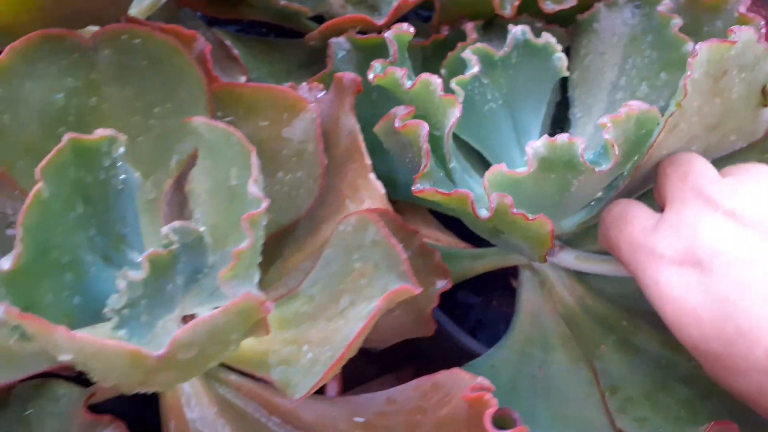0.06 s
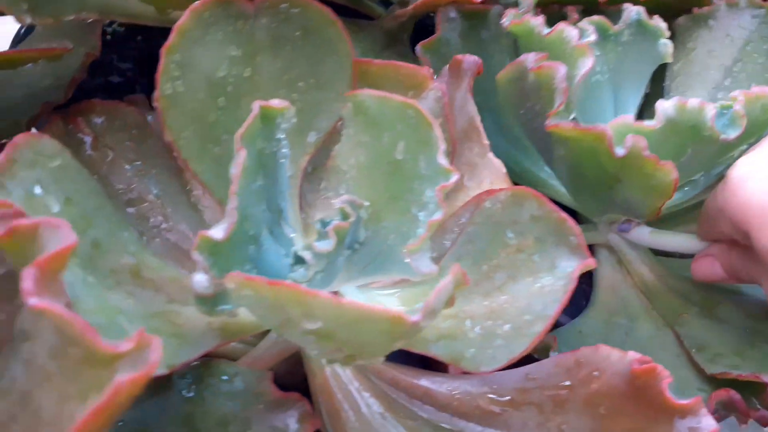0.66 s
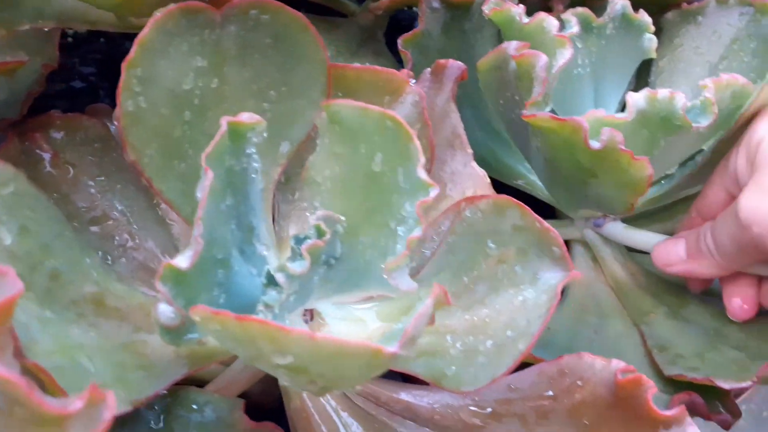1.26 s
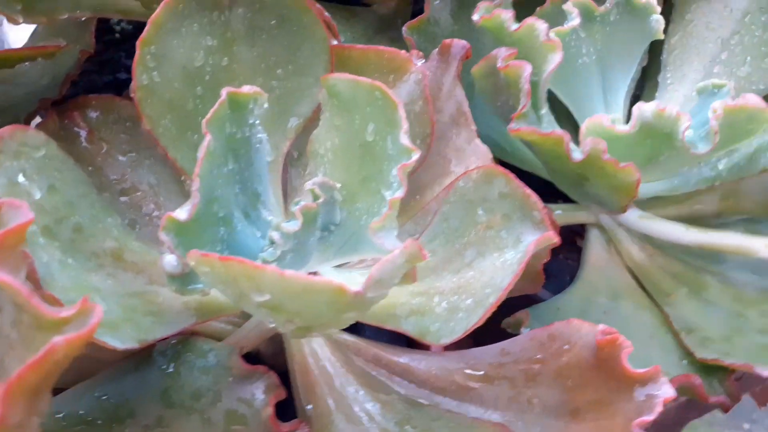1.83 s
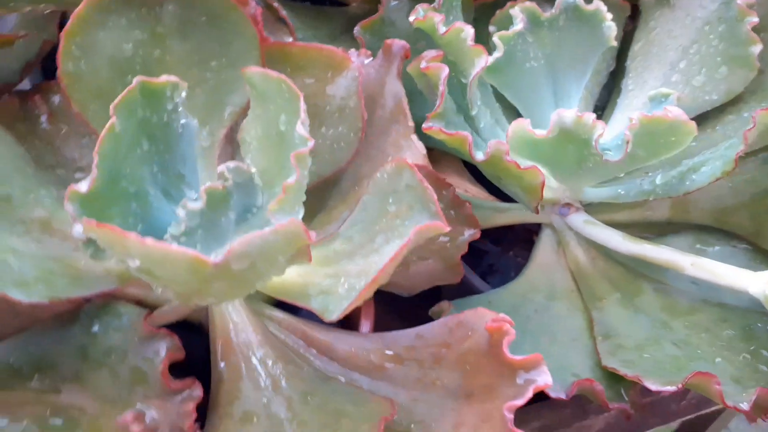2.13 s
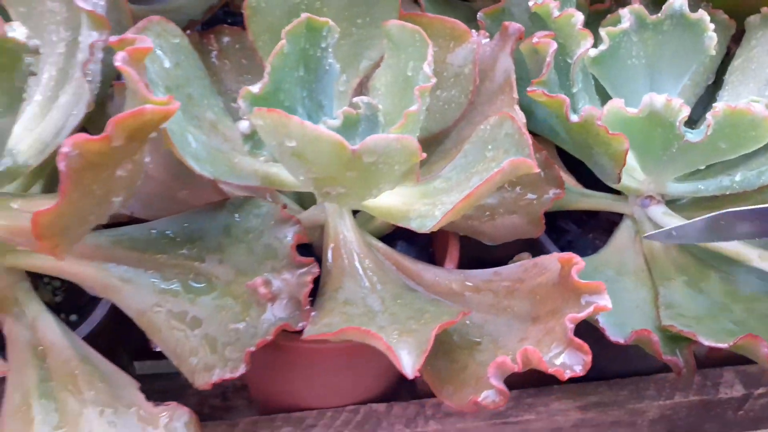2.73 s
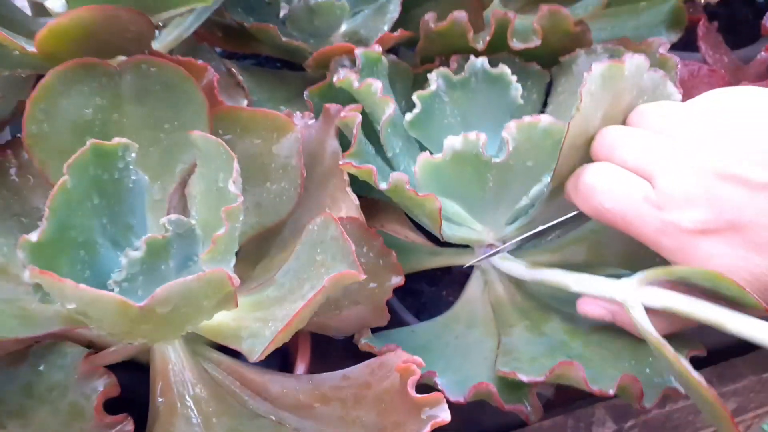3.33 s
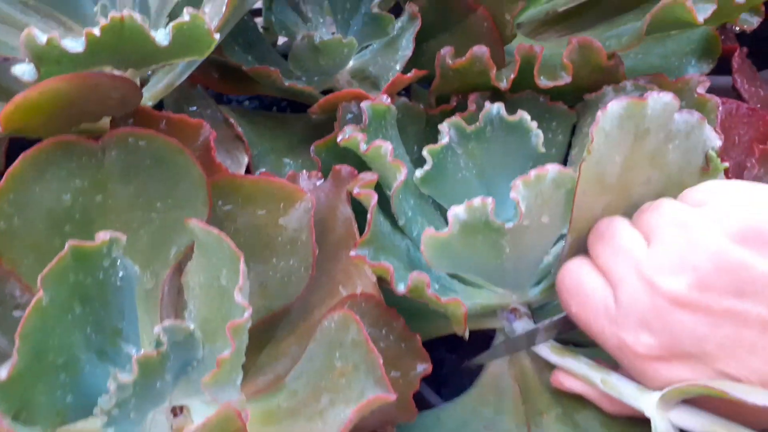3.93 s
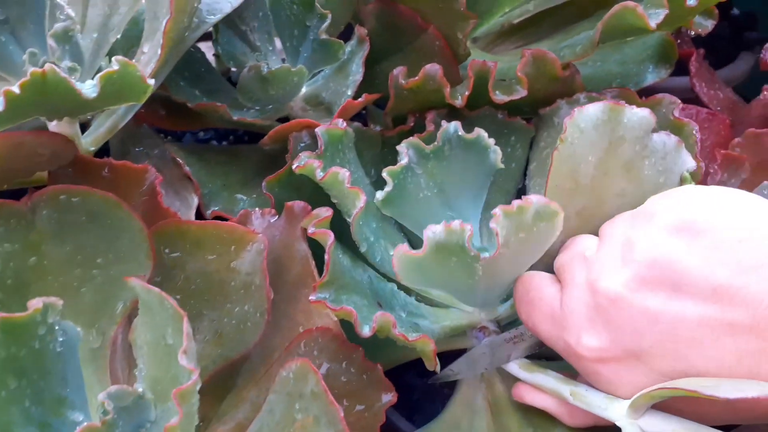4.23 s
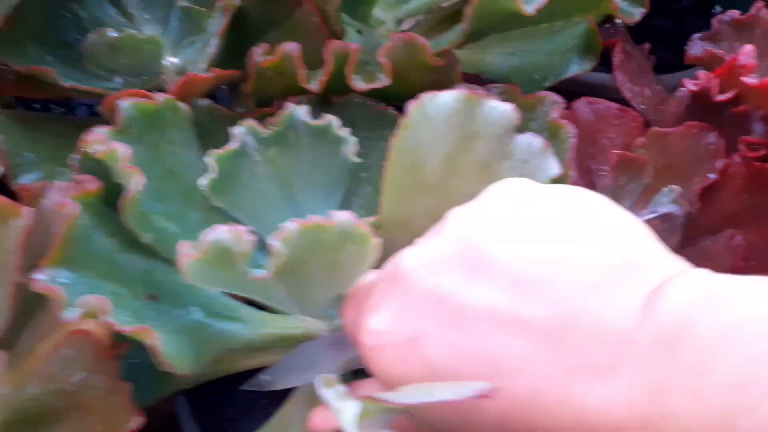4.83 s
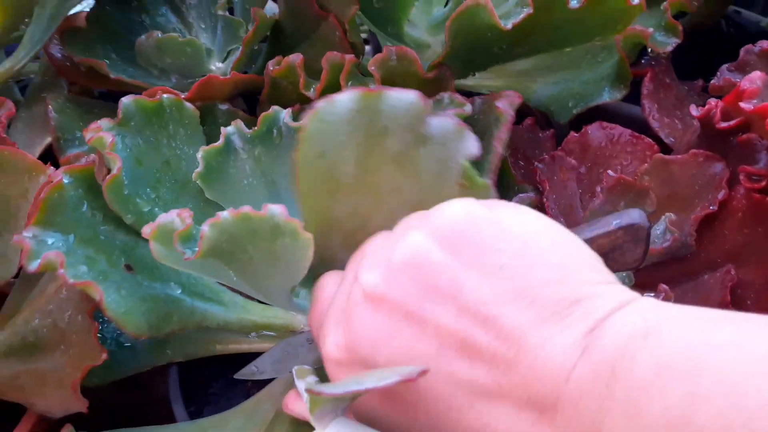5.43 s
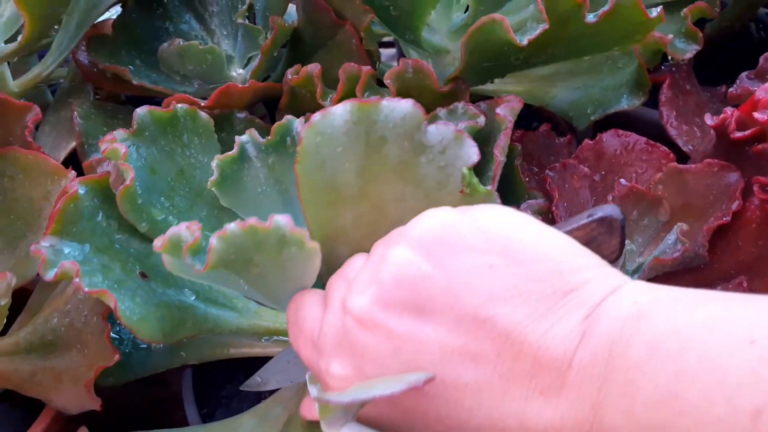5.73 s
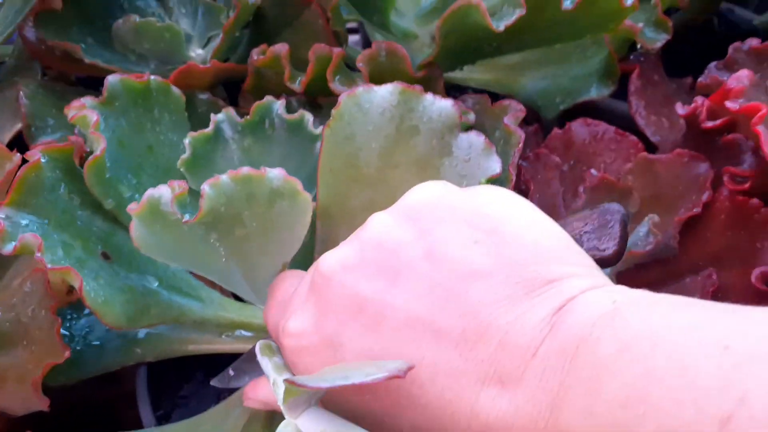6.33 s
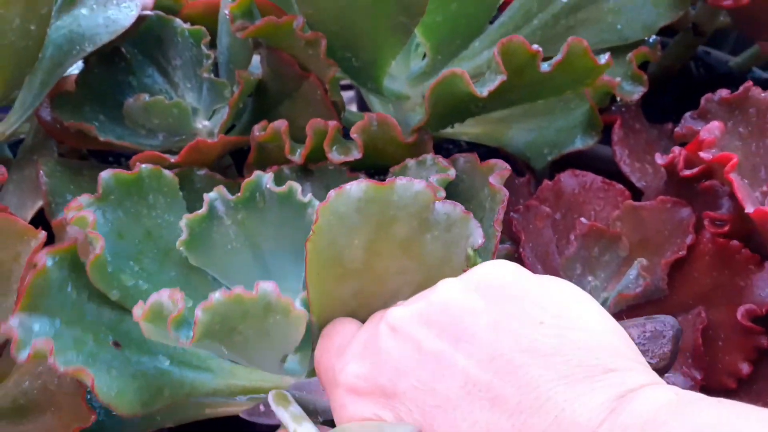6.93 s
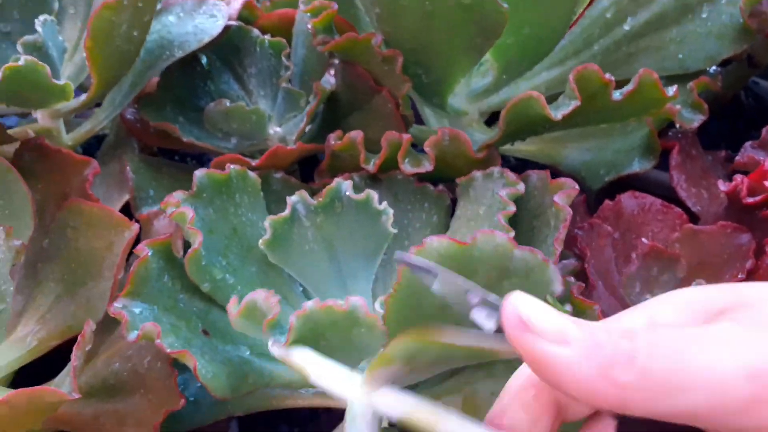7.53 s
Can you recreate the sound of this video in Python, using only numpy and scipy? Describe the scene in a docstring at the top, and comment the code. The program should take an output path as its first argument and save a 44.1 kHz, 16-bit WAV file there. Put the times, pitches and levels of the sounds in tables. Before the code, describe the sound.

Short, low dove coos repeat outdoors while a far vehicle pulls away and a succulent stem clicks sharply under a knife.

```python
"""A backyard: a dove coos nine times while a knife works on a succulent close to the microphone.
Each coo is a near-pure arch of pitch that beats against its echoes. Leaves rustle and a fine hiss swells
and fades; the juicy stem snaps in sharp clicks as its cells burst. Beyond the yard a vehicle pulls away,
its exhaust note climbing three times over a low wash of traffic. The microphone is bumped once."""
import sys
import numpy as np
from scipy import signal
from scipy.fft import rfft, irfft
from scipy.io import wavfile
from scipy.ndimage import uniform_filter1d

SR = 44100
rng = np.random.default_rng(int(sys.argv[2]) if len(sys.argv) > 2 else 0)


def transcribe(signal):
    """Save signal, clipped to [-1, 1], as a 16-bit WAV file at the path in sys.argv[1]."""
    frames = np.atleast_2d(signal).T
    limited = np.clip(frames, -1, 1)
    pcm = np.round(limited * 32767).astype(np.int16)
    wavfile.write(sys.argv[1], SR, pcm)


N = 334278

# Each row: start, length and rise in seconds, pitch in Hz, climb in Hz/s, level and swell in dB,
# hoarse opening's delay in seconds and level in dB, held octave in dB, echo delay in seconds, echo in dB.
COOS = [ (-.041, 0.47, 0.15, 347.6, -41.5, -44, -0.5, 0.1, -67, -70.5, 0.07, -5.5),
        (0.881, 0.43, .110, 346.8, 75.5, -41.5, 3, 0.0099, -63, -69.5, 0.029, -6),
        (1.820, 0.31, 0.085, 326.8, -35, -43.5, 7, 0.0091, -56.5, -72.5, .0310, -7),
        (2.628, 0.5, 0.11, 352.4, 151, -42.5, 7.5, 0.027, -56, -81, 0.021, -11),
        (3.48, .542, 0.11, 340, 238, -45.5, 9, 0.073, -62, -87, 0.05, -5),
        (4.379, 0.44, 0.11, 347, 160, -46.5, 7, 0.072, -62.5, -71, 0.037, -4.5),
        (5.213, .514, .107, 353, 166, -47.5, 8.5, .03, -61, -70, 0.01266, -5.5),
        (6.149, 0.45, 0.099, 350, -34, -43.5, 7, 0.013, -60.5, -75, .0130, -7.5),
        (7.016, 0.47, 0.13, 359.8, 12, -44.5, 7, 0.035, -57.5, -85, .0157, -7.5), ]
# Far yard walls. Each row: delay in seconds, gain in dB.
WALL_ECHOES = [(.037,-15.5),(.058,-14.5)]
# Brief dropouts of the coos. Each row: time in seconds, share lost from 0 to 1.
COO_DIPS = [(.18,0.4),(1.07,.7),(2.825,1),(3.093,.6),(4.85,.5),(5.42,.6),(6.535,0.47),(3.91,0.8),(4.59,.6),(5.52,0.8),(5.606,.6),(6.416,1),(6.477,0.66),(7.2,0.5),(7.285,0.8),(7.361,1)]
# Each row: time in seconds, then rumble, body and tyre roar in relative dB.
TRAFFIC_LEVELS = [(0,-61.5,-62,-80.5),(.65,-64,-65,-81),(1.05,-58.5,-63,-82.5),(1.75,-60,-64,-72.5),(2.5,-61,-63,-77.5),(3.02,-56,-53.5,-71.5),(3.35,-61.5,-59.5,-81.5),(3.8,-57,-53.5,-72.5),(4.25,-66.5,-53.5,-74),(4.6,-61,-52.5,-73),(4.95,-57,-50.5,-64.5),(5.25,-60.5,-50.5,-64.5),(5.95,-55.5,-58.5,-74.5),(6.45,-59,-56,-71.5),(6.85,-58.5,-62,-72.5),(7.15,-60,-56.5,-68),(7.58,-61.5,-57,-69)]
# Noise colours. Each row: frequency in Hz, spectral density in relative dB.
RUMBLE_SPECTRUM = [(20,-32.5),(40,-25),(65,-0.5),(110,6.5),(150,-6.5),(220,-26.5),(400,-69.5)]
BODY_SPECTRUM = [(90,-30),(160,-8),(230,0),(350,1),(430,-7),(560,-16),(800,-25.5),(1500,-74)]
TYRE_SPECTRUM = [(250,-29),(480,1),(700,-4.5),(1000,-7),(1500,-12.5),(1900,-19.5),(4000,-46.5)]
AIR_SPECTRUM = [(900,-23),(1500,-12),(2500,0.5),(4000,-5),(5700,-9),(7500,-0.5),(9500,-7),(13000,-5.5),(15800,-6)]
HISS_SPECTRUM = [(600,-39.5),(1500,5),(2500,-0.5),(4000,1),(6000,0),(8200,-0.5),(9600,-15.5),(11000,-13),(13000,-4.5),(15800,-10.5)]
CRACK_SPECTRUM = [(100,1),(800,-0.5),(1400,-4),(2200,-1.5),(4000,-4),(8000,0),(10000,-1),(13000,-3.5),(16000,-10.5)]
# Each row: frequency in Hz, left-right correlation.
NOISE_COHERENCE = [(60, 0.26), (130, 1), (290, 0.91), (640, 0.19), (1410, -0.07), (3100, 0.06),
                   (6820, 0.42), (15000, 0.0)]
# Each row: frequency in Hz, pan in dB. Pan is left minus right throughout.
NOISE_PAN = [(60,-10),(130,-3.5),(290,-6),(640,-10.5),(1400,-10.5),(3100,-8.5),(6800,-13),(11000,0.5),(15000,-7.5)]
# Fine high hiss. Each row: start and length in seconds, relative level and its change in dB.
HISS_SWELLS = [(0.067,0.39,-82.5,4),(1.15,0.8,-76,-2),(2.316,0.13,-82,-8),(2.876,0.34,-71.5,-0.5),(3.478,1.48,-78,0.5),(4.892,0.717,-67,-5),(5.614,0.355,-68.5,1),(6.194,0.57,-67,4.5),(6.72,.3,-77,0),(7.022,0.5,-67,4)]
# Brief soft noise: rustles and a few faint, high, narrow-band whispers.
# Each row: midpoint and length in seconds, centre and width in Hz, level in dB.
SOFT_PATCHES = [(0.126,0.056,2560,3450,-70),(0.186,0.081,9000,9000,-69.5),(0.702,.1,2970,1820,-59),(0.718,.14,6600,11000,-65.5),(1.65,0.31,12700,4000,-73.5),(1.861,0.089,2530,2200,-65),(2.199,.9,1390,500,-75.5),(2.533,0.3,4400,1010,-72.5),(2.498,0.29,7350,1990,-76.5),(2.901,0.41,6760,900,-70),(3.428,0.18,13400,6000,-71),(3.635,0.17,5300,3000,-62),(4.87,0.15,13500,4000,-66.5),(5.503,0.13,3070,3570,-60),(5.788,.19,4470,1600,-64.5),(6.065,0.51,7700,1400,-72),(6.453,0.18,2490,1800,-61),(6.5,0.15,5070,5030,-66),(6.52,0.13,13900,4000,-65),(7.031,.13,4000,7000,-64.5),(7.379,.33,13900,5000,-70)]
# The right port favours the middle, the left the top. Each row: frequency in Hz, pan in dB.
CRACK_PAN = [(500,4),(4000,-6),(8000,-5.5),(11000,14),(16000,-5)]
# Each row: start in seconds, relative level and pan in dB, decay in seconds, low and high stem ring
# in Hz, thump in relative dB, thump pitch in Hz, blade ring in relative dB.
STEM_SNAPS = [(4.2846,-34.5,-2.5,0.0023,2600,4800,-42.5,840,-54),(5.8840,-31,-7.5,0.0032,4200,6300,-38.5,234,-57),(6.2550,-28.5,-3,0.0022,4080,8140,-39.5,323,-29.5),(6.9925,-41,-0.5,0.0031,940,7600,-48,107,-52)]
# Knife and leaf. Each row: start in seconds, relative level and pan in dB, centre in Hz.
KNIFE_TICKS = [(0.685,-41.5,-6,2990),(1.2182,-43.5,0,8240),(1.497,-35,-12.5,7260),(3.126,-45.5,-10,13080),(3.3354,-45,-2,7500),(3.37,-47.5,7,12100),(4.9088,-24.5,-2.5,7140),(5.478,-37,-16,3000),(5.506,-39,-13,4500),(5.854,-40,-8,4030),(6.1734,-38.5,-5,1600),(6.411,-38.5,0,6810),(6.512,-38.5,-4,5900),(6.6489,-31.5,-4.5,2390),(6.655,-38,-15,7030),(7.0447,-33,-4,1150),(7.055,-36.5,-6,5900),(7.0753,-35,-5,1170)]
# Each row: start and length in seconds, first and last firing rate in Hz, easing from 0 to 1,
# time to peak in seconds, level in dB, fade in dB/s.
ENGINE_PULLS = [(2.1, 1.1, 89.56, 124.3, 0.03, 0.99, -55.5, 4.5),
                (3.299, 0.86, 61.54, 86.3, 0, 0.36, -49, 26), (4.499, 1.1, 92.6, 118.1, .65, 0.42, -44, 27)]
# Throttle open. Each row: multiple of the firing rate, relative level in dB.
EXHAUST_PARTIALS = [(2,-5),(3,4),(4,-14),(5,-3.5),(6,1),(7,-14),(8,-11)]

T = np.arange(N) / SR


def gain_of(db):
    """Decibels to amplitude."""
    return 10 ** (np.asarray(db) / 20)


def unit_rms(x):
    """Scales to an rms of one."""
    return x / np.sqrt(np.mean(x ** 2) + 1e-20)


def at_hz(table, hz):
    """Interpolates a table over log frequency."""
    knots_hz, values = np.transpose(table)
    return np.interp(np.log(hz + 1), np.log(knots_hz + 1), values)


def add(mix, start_s, sound):
    """Mixes a sound in at start_s."""
    part = mix[..., max(round(start_s * SR), 0):][..., :sound.shape[-1]]
    part += sound[..., :part.shape[-1]]


def pan(pan_db):
    """Left and right gains with a mean of one."""
    pair = gain_of(np.array([[.5], [-.5]]) * pan_db)
    return pair / pair.mean(0)


def bell(x, centre, half_width):
    """Gaussian of height one."""
    return np.exp(-((x - centre) / half_width) ** 2)


def waver(n, hz):
    """Smooth random motion up to about hz."""
    bins_hz = np.fft.rfftfreq(n + SR, 1 / SR)
    return unit_rms(irfft(rfft(rng.standard_normal(n + SR)) * bell(bins_hz, 0, hz)))[:n]


def ring(x, hz, width_hz, passes=1):
    """Two-pole resonance, applied passes times; unit rms."""
    b, a = signal.iirpeak(hz, hz / width_hz, SR)
    for _ in range(passes):
        x = signal.lfilter(b, a, x)
    return unit_rms(x)


def noise(spectrum, patch_db):
    """Coloured stereo noise with drifting patches."""
    frames, hz = N // 512 + 5, np.fft.rfftfreq(2048, 1 / SR)
    a, b, c, d, patches = rng.standard_normal((5, frames, len(hz)))
    patches = unit_rms(uniform_filter1d(uniform_filter1d(patches, size=9, axis=0), size=24, axis=1))
    coherence = at_hz(NOISE_COHERENCE, hz)
    left = a + 1j * b
    right = coherence * left + np.sqrt(1 - coherence ** 2) * (c + 1j * d)
    colour = gain_of(at_hz(spectrum, hz) + patch_db * patches)
    bins = np.array([left, right]) * colour * pan(at_hz(NOISE_PAN, hz))[:, None]
    x = signal.istft(bins.swapaxes(1, 2), nperseg=2048, noverlap=1536)[1][:, :N]
    return x / x.mean(0).std()


def scatter(x, t60_s):
    """Diffuse tail from fences and plants, different in each ear."""
    t = np.arange(SR // 2) / SR
    taps = rng.standard_normal((2, len(t))) * gain_of(-60 * t / t60_s) * (1 - np.exp(-t / t60_s * 20))
    return signal.oaconvolve(np.atleast_2d(x), taps / np.linalg.norm(taps[0]), axes=1)[:, :N]


def coo(t, length_s, rise_s, top_hz, climb_hz_per_s, level_db, swell_db, open_s, open_db, held_db):
    """A near-sine rises, holds and drops; its slack, low ends are hoarse and carry a ragged octave."""
    slack_hz, throat_cutoff_hz, fall_s, close_db = 233.2, 288.4, .028, -56
    n = len(t)
    rise = 1 - bell(np.maximum(t, 0), 0, rise_s)
    fall = 1 - np.exp(-np.maximum(length_s - t, 0) / fall_s)
    arch = rise * fall
    slack = 1 - arch
    hz = slack_hz + (top_hz + climb_hz_per_s * (t - length_s / 2) - slack_hz) * arch
    jitter = .0075 * (1 + 2 * slack) * waver(n, hz=57.8)
    phase = 2 * np.pi * np.cumsum(hz * (1 + jitter)) / SR
    octave = np.sin(2 * phase + .5 * waver(n, hz=40)) * (1 + .25 * waver(n, hz=30))
    effort = gain_of(level_db + swell_db * (t / length_s - .5)) / (1 + (throat_cutoff_hz / hz) ** 16)
    opening = gain_of(open_db) * bell(t, open_s, .041)
    held = gain_of(held_db) * bell(t / length_s, .72, .31)
    closing = gain_of(close_db) * bell(t, length_s + .0049, .021)
    voice = effort * np.sin(phase) + (opening + held + closing) * octave
    flutter = 1 + (.12 + .22 * slack) * waver(n, hz=100)
    return np.sqrt(2) * voice * flutter * signal.windows.tukey(n, .1)


def dove(pan_db=-3.5, yard_db=-16, margin_s=.06, dip_half_s=.014):
    """Gliding coos beat against echoes: a near one that shifts as the microphone moves, and the walls."""
    near = np.zeros(N)
    for start_s, length_s, *shape, echo_s, echo_db in COOS:
        onset_s = max(start_s - margin_s, 0)
        call = coo(np.arange(onset_s - start_s, length_s + margin_s, 1 / SR), length_s, *shape)
        add(near, onset_s, call)
        add(near, onset_s + echo_s, gain_of(echo_db) * call)
    heard = near.copy()
    for delay_s, db in WALL_ECHOES:
        add(heard, delay_s, gain_of(db) * near)
    for time_s, lost in COO_DIPS:
        heard *= 1 - lost * bell(T, time_s, dip_half_s)
    return pan(pan_db) * (heard + gain_of(yard_db) * scatter(near, t60_s=.8))


def traffic(rumble_trim_db=-1, body_trim_db=4, tyre_trim_db=5):
    """Rumble, body and tyre roar swell as the vehicle goes by."""
    times_s, *levels_db = np.transpose(TRAFFIC_LEVELS)
    rumble_db, body_db, tyre_db = (np.interp(T, times_s, db) for db in levels_db)
    return (gain_of(rumble_db + rumble_trim_db) * noise(RUMBLE_SPECTRUM, patch_db=1)
            + gain_of(body_db + body_trim_db) * noise(BODY_SPECTRUM, patch_db=1.5)
            + gain_of(tyre_db + tyre_trim_db) * noise(TYRE_SPECTRUM, patch_db=2.5))


def air(hiss_db=-80, band_db=-78, pan_db=-6):
    """Faint steady hiss with one narrow band standing out."""
    band = ring(rng.standard_normal((2, N)), hz=4820, width_hz=640, passes=2)
    return gain_of(hiss_db) * noise(AIR_SPECTRUM, patch_db=.7) + gain_of(band_db) * pan(pan_db) * band


def swelling_hiss(trim_db=-2, floor_db=-91.5, edge_s=.028, crackle_db=-7, crackles_per_s=100):
    """A fine high hiss with tiny crackles swells and fades over a faint steady floor."""
    level = np.full(N, gain_of(floor_db))
    for start_s, length_s, db, change_db in HISS_SWELLS:
        t = T - start_s
        gate = (np.tanh(t / edge_s) - np.tanh((t - length_s) / edge_s)) / 2
        level += gate * gain_of(db + trim_db + change_db * (np.clip(t / length_s, 0, 1) - .5))
    sizes = np.exp(.7 * np.minimum(rng.exponential(1, N), 3))
    impulses = sizes * (rng.random(N) < crackles_per_s / SR)
    crackle = unit_rms(np.convolve(impulses, np.exp(-np.arange(200) / 40))[:N])
    flicker = gain_of(1.8 * waver(N, hz=18))
    grain = flicker * np.sqrt(1 + (gain_of(crackle_db) * crackle) ** 2)
    return level * noise(HISS_SPECTRUM, patch_db=2.5) * grain


def rustles_and_whispers(grain_db=3.5, pan_db=-6):
    """Brief soft patches of grainy noise: wide bands rustle, narrow high ones whisper."""
    out = np.zeros((2, N))
    for mid_s, length_s, hz, width_hz, db in SOFT_PATCHES:
        n = round(length_s * SR)
        grainy = rng.standard_normal((2, n)) * gain_of(grain_db * waver(n, hz=300))
        patch = ring(grainy, hz, width_hz, passes=2) * np.hanning(n)
        add(out, mid_s - length_s / 2, gain_of(db) * pan(pan_db) * patch)
    return out


def fracture(t, decay_s, rise_s=.00047, split_hz=9000, top_decay_ratio=.63):
    """Plant cells burst in a run that dies within milliseconds, the top first."""
    hz = np.fft.rfftfreq(len(t), 1 / SR)
    phasors = np.exp(2j * np.pi * rng.random((2, len(hz))))
    bursts = phasors * gain_of(at_hz(CRACK_SPECTRUM, hz)) * pan(at_hz(CRACK_PAN, hz))
    lowpass = 1 / (1 + (hz / split_hz) ** 4)
    body = irfft(bursts * lowpass, len(t)) * np.exp(-t / decay_s)
    top = irfft(bursts * (1 - lowpass), len(t)) * np.exp(-t / (decay_s * top_decay_ratio))
    return unit_rms((body + top) * (1 - np.exp(-t / rise_s)))


def knife(snap_trim_db=-9, tick_trim_db=-26, stem_db=-4, thump_cycles=1.5):
    """Snaps ring stem and blade and jolt the fleshy plant; the ground returns each click."""
    ground_s, ground_db, yard_db = .0098, -21, -24
    out, t = np.zeros((2, N)), np.arange(2048) / SR
    for start_s, db, pan_db, decay_s, low_hz, high_hz, thump_db, thump_hz, blade_db in STEM_SNAPS:
        crack = fracture(t, decay_s)
        stem = ring(crack, low_hz, width_hz=480) + ring(crack, high_hz, width_hz=680)
        snap = gain_of(db) * unit_rms(crack + gain_of(stem_db) * stem) * pan(pan_db)
        blade = gain_of(blade_db) * ring(crack, hz=14600, width_hz=700)
        thump = 2 * gain_of(thump_db) * np.sin(2 * np.pi * thump_hz * t)
        thump *= np.exp(-t * thump_hz / thump_cycles)
        add(out, start_s, gain_of(snap_trim_db) * (snap + blade) + thump * pan(pan_db))
    for start_s, db, pan_db, hz in KNIFE_TICKS:
        crack = fracture(t, decay_s=.0015)
        tick = unit_rms(crack + ring(crack, hz, width_hz=hz / 2))
        add(out, start_s, gain_of(db + tick_trim_db) * pan(pan_db) * tick)
    add(out, ground_s, gain_of(ground_db) * out)
    return out + gain_of(yard_db) * scatter(out, t60_s=.2)


def engine(wander=.012, roughness=.16, surge_db=2.5, nearest_s=5.203, near_db=-54, pan_db=-6):
    """A distant exhaust note climbs, swells and fades in each pull, brightest at the nearest point."""
    out = np.zeros(N)
    for start_s, length_s, first_hz, last_hz, easing, peak_s, db, fade_db_per_s in ENGINE_PULLS:
        t = np.arange(0, length_s, 1 / SR)
        n, progress = len(t), t / length_s
        firing_hz = first_hz + (last_hz - first_hz) * (progress + easing * progress * (1 - progress))
        phase = 2 * np.pi * np.cumsum(firing_hz * (1 + wander * waver(n, hz=25))) / SR
        overtones = sum(gain_of(partial_db) * np.sin(k * phase) * (1 + roughness * waver(n, hz=42))
                        for k, partial_db in EXHAUST_PARTIALS)
        boom = gain_of(db - fade_db_per_s * abs(t - peak_s) + surge_db * waver(n, hz=10))
        nearness = gain_of(near_db) * bell(start_s + t, nearest_s, .25)
        add(out, start_s, (boom * np.sin(phase) + nearness * overtones) * signal.windows.tukey(n, .15))
    return pan(pan_db) * out


def mic_bump(mid_s=3.05, length_s=.28, level_db=-59):
    """A soft low bump as the microphone is moved."""
    out, n = np.zeros((2, N)), round(length_s * SR)
    bump = ring(rng.standard_normal(n), hz=45, width_hz=50, passes=2) * np.hanning(n)
    add(out, mid_s - length_s / 2, gain_of(level_db) * bump)
    return out


def scene():
    """Everything heard in the yard."""
    return (dove() + engine() + traffic() + air() + swelling_hiss() + rustles_and_whispers()
            + knife() + mic_bump())


def record(dry):
    """The recorder's band limit."""
    lowpass = signal.firwin(511, cutoff=16100, window=("kaiser", 9), fs=SR)
    return signal.oaconvolve(dry, lowpass[None], "same")


dry = scene()
out = record(dry)
transcribe(out)
```